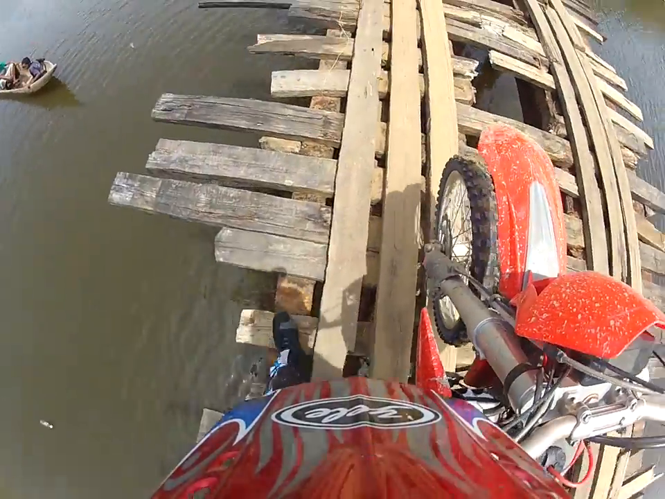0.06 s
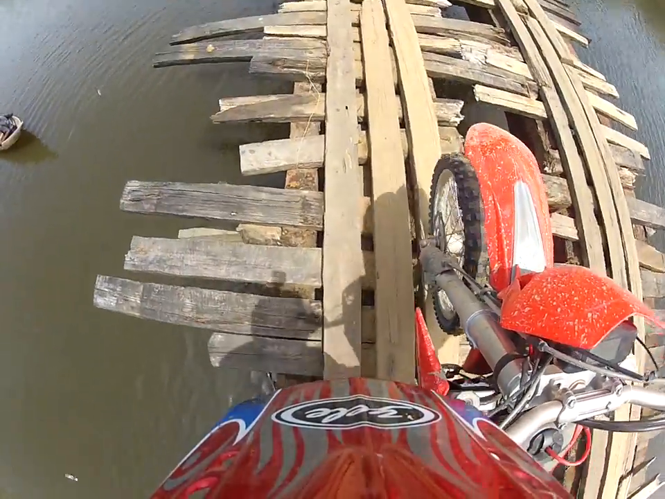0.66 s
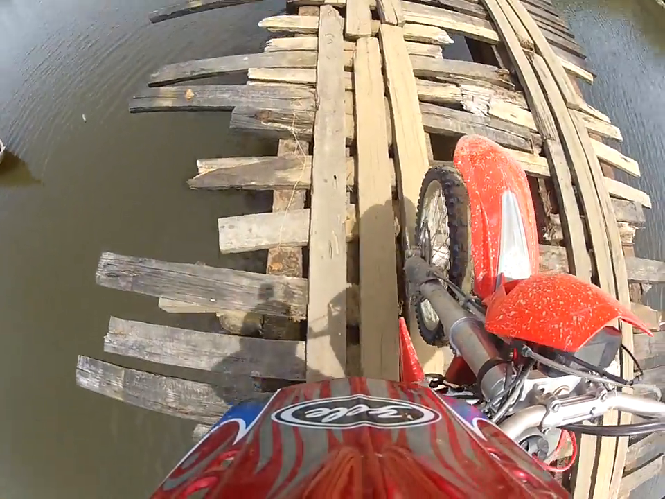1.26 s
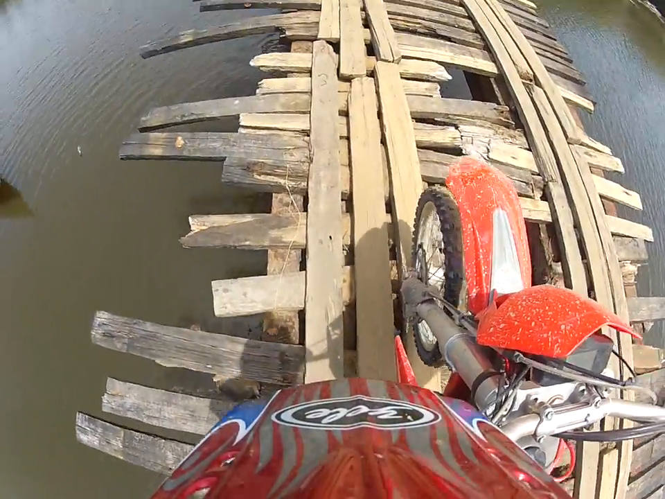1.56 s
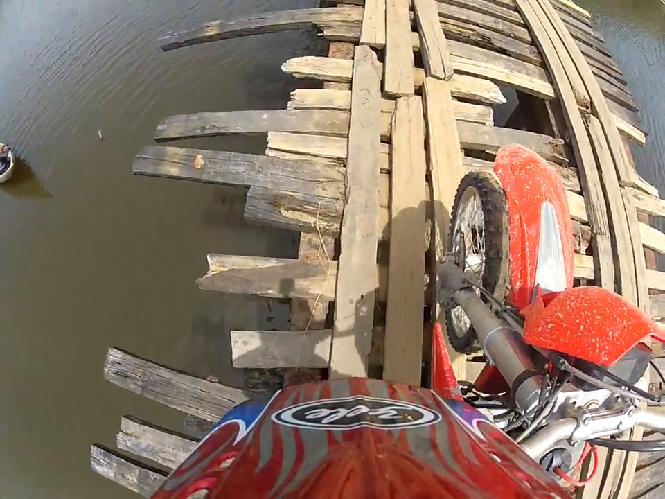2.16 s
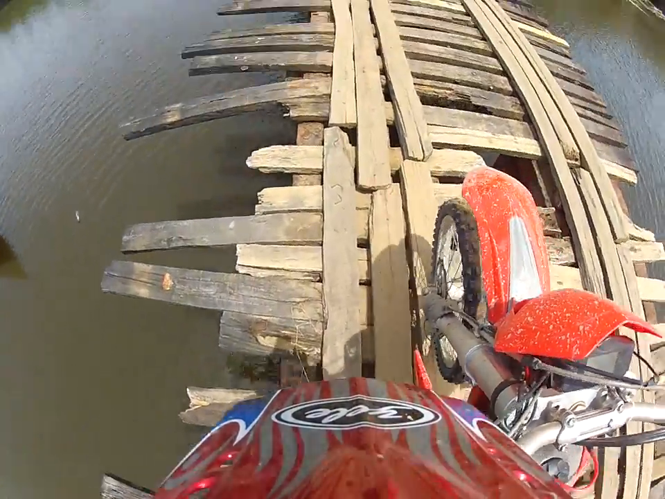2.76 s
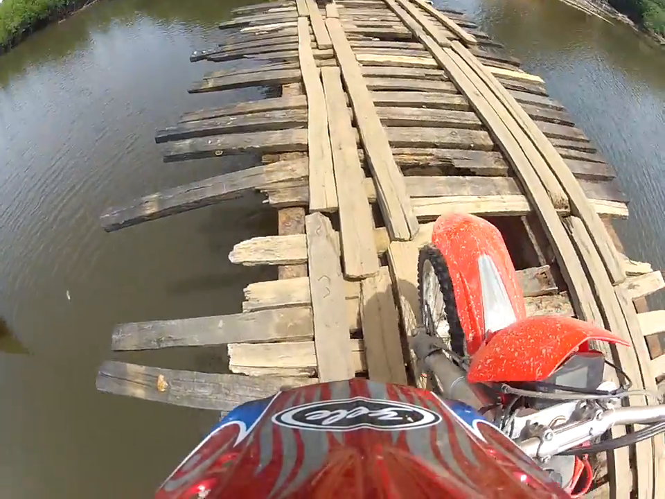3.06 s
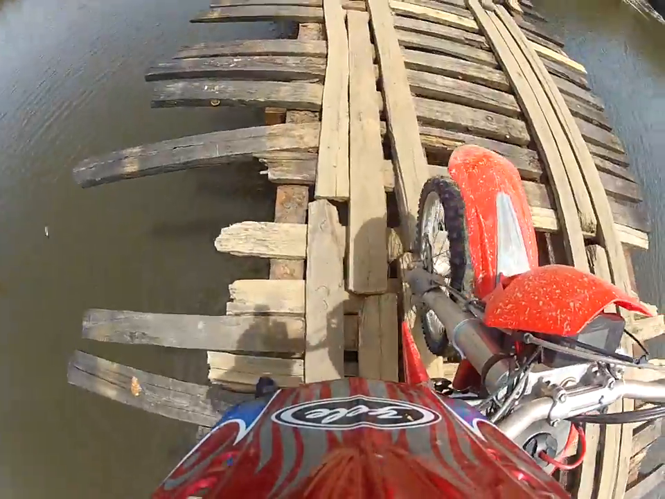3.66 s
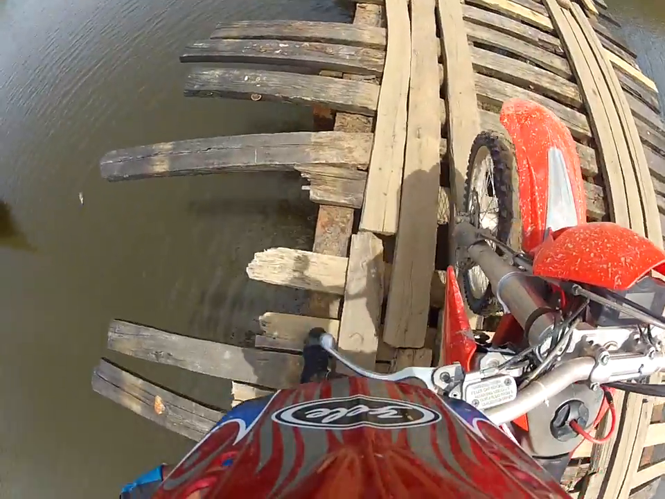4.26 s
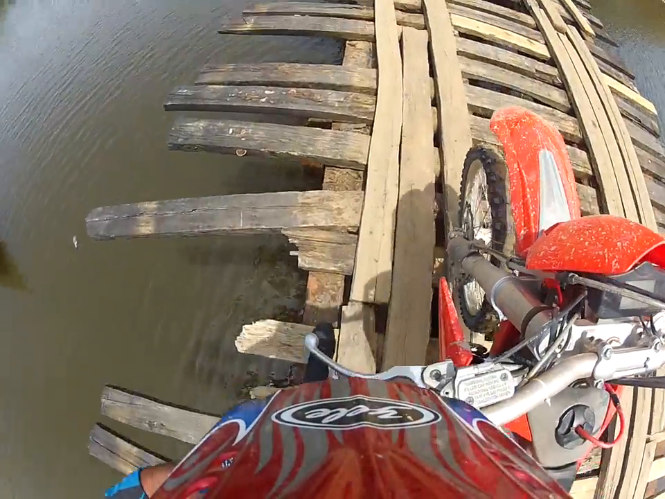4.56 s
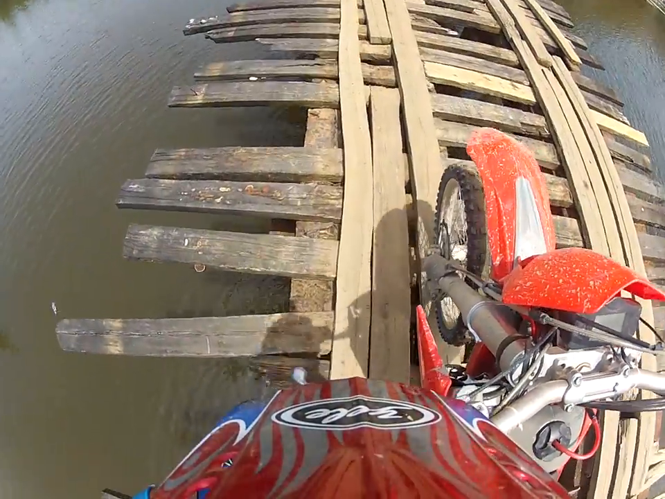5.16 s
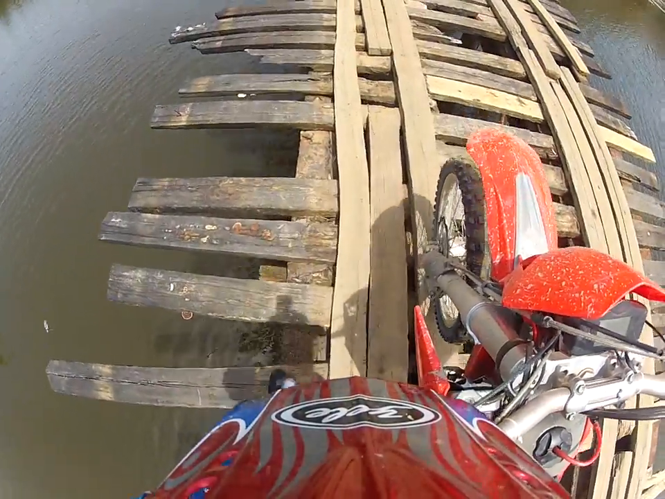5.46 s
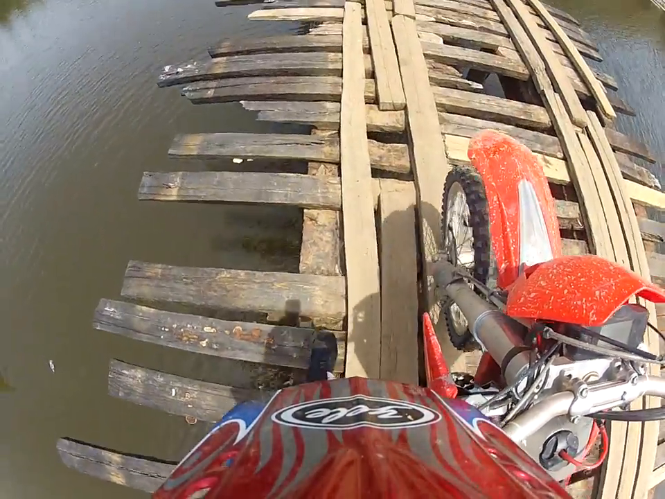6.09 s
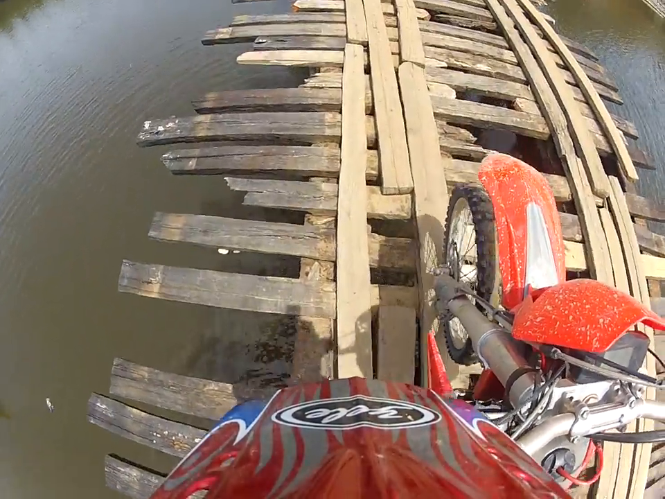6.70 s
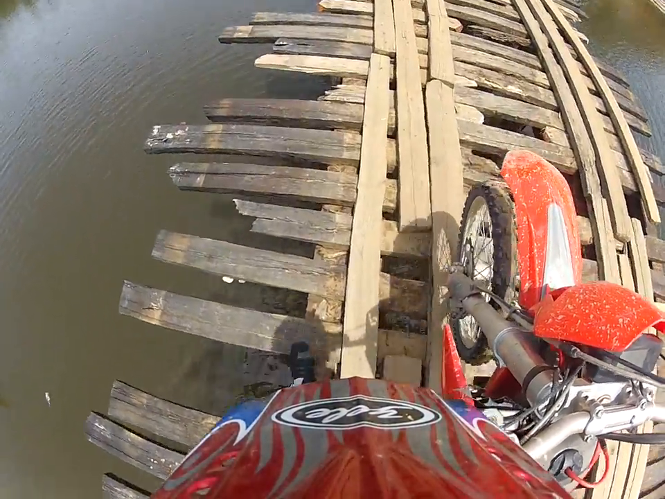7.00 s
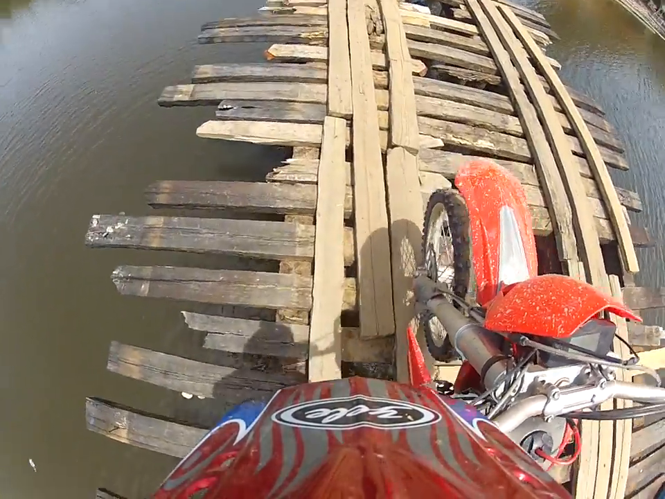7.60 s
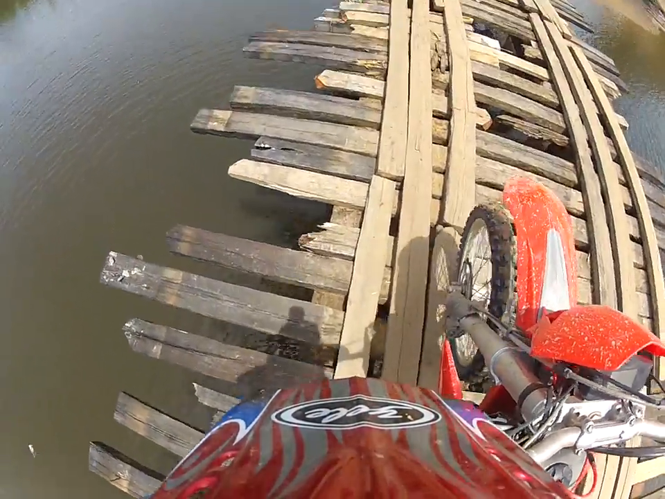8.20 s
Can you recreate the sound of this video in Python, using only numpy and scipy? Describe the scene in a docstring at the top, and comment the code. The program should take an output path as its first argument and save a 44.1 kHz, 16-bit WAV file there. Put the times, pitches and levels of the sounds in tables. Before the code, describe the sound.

A dirt bike's engine putters quietly outdoors while it rolls across a footbridge of loose boards, heard from close by without echo. The planks are much louder, giving dry clacks and hollow thumps in irregular bunches with short gaps between. The sharpest cracks come about three and five seconds in, and the clatter gets busier near the end. Faint gritty scrapes and soft rumbling lurches accompany the knocking.

```python
"""Loose planks clack as a dirt bike is walked over a footbridge, its single cylinder idling quietly.
Each impact excites resonances and reaches a bike-level camera as a dry clack with a low thud: the
harder, the shorter the contact and the brighter the sound. A few boards crack sharply. About once a
second the bike lurches, which sets the camera mount swaying and the fittings rattling. The camera
holds each of its slow samples, and the spectral images put a thin metallic edge on every clack."""
import sys
import numpy as np
from scipy import signal
from scipy.fft import rfft, irfft, next_fast_len
from scipy.io import wavfile
from scipy.ndimage import map_coordinates

SR = 44100
rng = np.random.default_rng(int(sys.argv[2]) if len(sys.argv) > 2 else 0)


def to_wav(sig):
    """Store sig (one row per channel, or 1-D mono) as 16-bit WAV at the path in sys.argv[1].

    Samples outside -1..1 are clipped; the rate is SR.
    """
    pcm = np.clip(np.atleast_2d(sig), -1, 1) * 32767
    pcm = np.round(pcm).astype(np.int16)
    wavfile.write(sys.argv[1], SR, pcm.T)  # frames by channels


N = 367794


# impacts of loose boards: t/s, relative level/dB
KNOCKS = [(0.1944, 5.5), (0.2127, -4), (0.3212, 2.5), (0.4229, 4), (0.4949, -1), (0.7385, 0), (2.0278, 9.5),
          (2.0715, 3.5), (2.1258, 0), (2.1895, -3.5), (2.4618, -5.5), (2.9377, 6.5), (2.9797, 0),
          (3.008, -3.5), (3.0185, 2), (3.0744, 6), (3.0894, -5.5), (3.134, -5.5), (3.2072, 7.5),
          (3.266, 4.5), (3.8042, 5), (3.815, 4), (3.9262, 2), (4.8281, 9), (4.8799, 3.5), (5.5134, 9.5),
          (5.7028, 2), (6.5703, 8.5), (6.64, -9), (6.7812, -1.5), (7.1398, 7), (7.1695, -1.5),
          (7.2437, 6.5), (7.2671, 2.5), (7.2917, -2.5), (7.3716, 2), (7.7205, 4), (7.909, -2), (8.0027, 1),
          (8.0752, 0.5), (8.1478, -6.5), (8.2112, 1.5), (8.2345, -3), (8.2938, -2)]
def clacks(contact_ms=.43, ms_per_db=.031, shortest_ms=.14):
    """Elastic impact: a harder blow has a shorter contact time and hence a wider spectrum."""
    force = np.zeros(N)
    for s, db in KNOCKS:
        strike(force, s, db, max(contact_ms - ms_per_db * db, shortest_ms))
    return transmitted(force)


# resonances (+) and antiresonances (-) that every knock passes: f/Hz, bandwidth/Hz, gain/dB
BODY = [(420, 330, 4), (630, 267, -12), (708, 25, 4), (750, 28, -5), (979, 159, 17), (1171, 94, 5),
        (1351, 25, -14), (1713, 95, 4), (2078, 305, 23), (2300, 120, 2), (2505, 50, -18), (2750, 58, -22),
        (3030, 120, 3), (3400, 120, -7), (3670, 90, 5), (3989, 700, -18)]
# treble roll-off of the clacks: f/Hz, amplitude ratio
TREBLE_ROLLOFF = [(4000, 1), (4800, .9), (5600, .3)]
def transmitted(force):
    """Structure-borne sound: resonances colour a force, and the clacks lose their treble above about 5 kHz."""
    return filtered(force, lambda hz: resonances(BODY, hz) * along(TREBLE_ROLLOFF, hz))


# low modes shaken by a knock: f/Hz, relative level/dB, T60/s
THUD_MODES = [(68, -37.5, 0.024), (95, -17, 0.18), (122.6, -2.5, 0.12), (217, -15.5, 0.065),
              (295, -6, 0.026)]
def thuds(gain_db=-29, growth=.33, contact_ms=.43, ms_per_db=.031, shortest_ms=.14):
    """Modal response: the same impacts ring low modes, which grow more slowly than the clack."""
    force = np.zeros(N)
    for s, db in KNOCKS:
        strike(force, s, gain_db + growth * db, max(contact_ms - ms_per_db * db, shortest_ms))
    return ring(force, THUD_MODES)


# cracks of strained wood: t/s, relative level/dB
CRACKS = [(2.0278, -6), (2.9572, 0), (2.9797, -9), (3.0185, 13.5), (3.077, -1), (3.266, -3), (4.8282, 13),
          (4.8394, -12), (5.5134, -5), (6.5703, -8)]
# spectrum of splintering: f/Hz, relative density level/dB
SPLINTER_SPECTRUM = [(200, -2.5), (600, -8.5), (1500, 1.5), (3000, -1.5), (3600, 1), (4400, -6),
                     (6000, -13.5)]
def cracks(edge_db=-30.5, edge_growth=1.7, snap_db=-4, snap_growth=.46, snap_ms=.044):
    """Release of strain: a crack is a snap and splinter noise; knocks get a splintery edge too."""
    snaps, splinters = np.zeros((2, N))
    for s, db in KNOCKS:
        add(splinters, s, amp(edge_db + edge_growth * db) * splinter_burst())
    for s, db in CRACKS:
        strike(snaps, s, snap_db + snap_growth * db, snap_ms)
        add(splinters, s, amp(db) * splinter_burst())
    return transmitted(snaps) + fittings(splinters, SPLINTER_SPECTRUM)


def splinter_burst(energy_db=-2, t60=.013):
    """Exponential decay: a burst of noise that dies almost at once."""
    t = np.arange(SR // 20) / SR
    burst = rng.standard_normal(len(t)) * amp(-60 * t / t60)
    return amp(energy_db) * burst / np.linalg.norm(burst)


# modes of a sinking board: f/Hz, relative level/dB, T60/s
HEAVE_MODES = [(32.7, -3, 0.3), (58.3, -5, 0.11), (90, -6.5, 0.11)]
# boards bottoming out under load: t/s, relative levels of heave/dB, hollow knock/dB, woody ring/dB
BUMPS = [(.213, -41, -7, -44), (1.134, -37, -17, -61), (2.029, -33, -5, -48), (3.022, -18, 0, -37),
         (3.07, -29, -12, -50), (4.135, -41, -12, -65), (4.828, -40.5, 15.5, -43), (7.245, -27, -6, -36),
         (7.292, -29.5, -6, -48.5), (8.208, -31, -11, -48)]
def bumps(soft_hz=250, hollow_hz=190, hollow_width_hz=260):
    """Damped vibration: a board settles on its beam with a slow heave and a heavily damped knock."""
    shoves, taps = np.zeros((2, N))
    for s, heave_db, knock_db, _ in BUMPS:
        add(shoves, s, amp([heave_db]))
        add(taps, s, amp([knock_db]))
    heave = filtered(ring(shoves, HEAVE_MODES), lambda hz: 1 / (1 + 1j * hz / soft_hz))
    return heave + filtered(taps, lambda hz: bandpass(hz, hollow_hz, hollow_width_hz))


def chatter(plank_hz=700, width_hz=240, t60=.075):
    """Noise-driven resonance: a board chattering on its beam rings briefly with a woody note."""
    envelope, t = np.zeros(N), np.arange(SR // 4) / SR
    for s, _, _, ring_db in BUMPS:
        add(envelope, s, amp(ring_db - 60 * t / t60))
    wood = filtered(rng.standard_normal(N), lambda hz: bandpass(hz, plank_hz, width_hz) ** 2)
    return envelope * unit(wood)


# forward lurches of the bike: centre t/s, duration/s, relative level/dB
LURCHES = [(.26, .2, -34), (1.234, 0.16, -31.5), (2.05, 0.21, -28.5), (3.13, .26, -33.5), (3.683, .23, -31),
           (4.57, .16, -40), (4.772, .12, -30), (5.55, 0.45, -31), (6.561, 0.34, -32), (7.308, 0.4, -28),
           (7.82, .2, -40), (8.228, 0.29, -30.5)]
def lurching():
    """Amplitude envelope of the bike's rocking: each lurch swells and fades smoothly."""
    rock = np.zeros(N)
    for s, length, db in LURCHES:
        add(rock, s - length / 2, amp(db) * np.hanning(int(length * SR)))
    return rock


def mount_sway(natural_hz=27.5, drift=.11, gain_db=-2.5, uneven_db=2.5, rest_db=-45, waver_db=3.5):
    """Mass on a spring: the mount rocks near its natural frequency, harder at each lurch."""
    driven = lurching() * amp(uneven_db * wobble(22))
    resting = amp(rest_db + waver_db * wobble(9))
    phase = 2 * np.pi * np.cumsum(natural_hz * (1 + drift * wobble(10))) / SR
    return amp(gain_db) * (driven + resting) * unit(np.sin(phase))


# strokes on the boards: t/s, duration/s, level/dB
SCRAPES = [(0, 0.11, -52), (0.273, 0.2, -66), (1.593, 0.072, -58.5), (2.954, 0.021, -39),
           (6.757, 0.052, -44.5), (7.51, 0.054, -59.5)]
# spectrum of a rubbed board: f/Hz, relative density level/dB
RUB_SPECTRUM = [(300, -19), (1400, 1.5), (2400, 3), (3100, -4), (4000, -18), (6000, -22.5)]
def scrapes(grit_db=3):
    """Sliding friction: tyre and boots drag over the wood in brief, gritty strokes of noise."""
    strokes = np.zeros(N)
    for s, length, db in SCRAPES:
        add(strokes, s, amp(db) * signal.windows.tukey(int(length * SR)))
    grit = rng.standard_normal(N) * amp(grit_db * wobble(400))
    return strokes * unit(fittings(grit, RUB_SPECTRUM))


# a short squeak: t/s, duration/s, start f/Hz, end f/Hz, peak level/dB
SQUEAKS = [(6.982, 0.064, 2210, 2350, -52)]
def squeak():
    """Linear chirp: a sine glides upward as it swells and fades."""
    out = np.zeros(N)
    for s, length, start_hz, end_hz, db in SQUEAKS:
        n = int(length * SR)
        phase = 2 * np.pi * np.cumsum(np.linspace(start_hz, end_hz, n)) / SR
        add(out, s, amp(db) * np.hanning(n) * np.sin(phase))
    return out


def engine(firing_hz=14, unsteady=.04, exhaust_db=-51.5, boom_db=2.5, rattle_db=1.5):
    """Four-stroke cycle: one firing every two turns paces exhaust and whir; both swell in a lurch."""
    rock = lurching()
    rock = rock / rock.max()
    cycle = np.cumsum(firing_hz * (1 + unsteady * wobble(3.6))) / SR
    return amp(exhaust_db + boom_db * rock) * exhaust(cycle) + amp(rattle_db * rock) * whir(cycle)


# exhaust resonances: f/Hz, relative level/dB, T60/s
PIPE_MODES = [(78.6, -29, 0.03), (120.3, 1.5, .13), (196, -3, .08), (224, -5, 0.074), (294.6, -5.5, 0.073),
              (338, -20, 0.017)]
def exhaust(cycle, scatter_db=1.8, puff_db=2, muffler_hz=420):
    """Pipe resonance: each firing and its rush of gas ring the pipe; the muffler is a low-pass."""
    firings = np.diff(np.floor(cycle), prepend=0) * amp(scatter_db * rng.standard_normal(N))
    puffs = rng.standard_normal(N) * amp(-9 * (cycle % 1))
    pipe = unit(ring(firings, PIPE_MODES)) + amp(puff_db) * unit(ring(puffs, PIPE_MODES))
    return unit(filtered(pipe, lambda hz: 1 / (1 + (hz / muffler_hz) ** 4)))


# spectrum of valve gear and air: f/Hz, relative density level/dB
WHIR_SPECTRUM = [(100, 10.5), (350, 4), (600, 0), (800, -2.5), (1400, -8), (2300, -10), (2800, -11),
                 (4400, -14), (5300, -16), (6000, -19)]
# slow course of the whir: t/s, relative level/dB
WHIR_LEVELS = [(0.0, -62.5), (1.32, -63.5), (3.25, -63), (3.55, -64.5), (5.64, -62), (6.06, -65),
               (7.15, -60.5), (7.67, -63.5), (8.34, -62)]
def whir(cycle, gain_db=6, throb_db=2.5, waver_db=.37):
    """Amplitude modulation: the noise of valve gear and air throbs in step with the firings."""
    level_db = np.interp(np.arange(N) / SR, *np.transpose(WHIR_LEVELS))
    noise = unit(fittings(rng.standard_normal(N), WHIR_SPECTRUM))
    throb = amp(throb_db * np.cos(2 * np.pi * cycle) + waver_db * wobble(12))
    return amp(level_db + gain_db) * throb * noise


# resonances of the bike's thin fittings: f/Hz, bandwidth/Hz, gain/dB
FITTINGS = [(967, 65, 7.5), (1174, 45, 8), (1903, 256, 12.5), (2437, 180, 9.5), (3010, 100, 5.5),
            (3660, 150, 4.5), (3890, 75, 3), (4230, 110, 2), (5140, 170, 6)]
def fittings(x, spectrum, cutoff_hz=6000):
    """Forced vibration: x takes on a broad, band-limited spectrum and rings the fittings."""
    def response(hz):
        return amp(along(spectrum, hz)) * resonances(FITTINGS, hz) / (1 + (hz / cutoff_hz) ** 20)
    return filtered(x, response)


def strike(force, s, db, contact_ms):
    """Impulse: add a Gaussian force pulse centred on s seconds, its area set by db."""
    lead = 1 / 500  # seconds allowed for the rise
    t = np.arange(SR // 20) / SR - lead
    bell = np.exp(-(2 * t * 1000 / contact_ms) ** 2)
    add(force, s - lead, amp(db) * bell / bell.sum())


def ring(blows, modes):
    """Convolution: each blow starts the same set of damped sines."""
    t = np.arange(SR // 2) / SR
    response = sum(amp(db - 60 * t / t60) * np.sin(2 * np.pi * hz * t) for hz, db, t60 in modes)
    return signal.fftconvolve(blows, response)[:N]


def resonances(table, f):
    """Causal transfer function of a structure: a cascade of peaks and notches."""
    response = 1
    for hz, width, db in table:
        spring, loss = hz * hz - f * f, 1j * f * width
        response = response * (spring + loss * max(amp(db), 1)) / (spring + loss * max(amp(-db), 1))
    return response


def bandpass(f, centre_hz, width_hz):
    """Velocity response of a damped oscillator, 1 at resonance."""
    loss = 1j * f * width_hz
    return loss / (centre_hz ** 2 - f * f + loss)


def filtered(x, response):
    """Linear filtering: multiply the spectrum of x by a frequency response."""
    m = next_fast_len(N + SR // 2)
    return irfft(rfft(x, m) * response(np.fft.rfftfreq(m, 1 / SR)), m)[:N]


def along(points, hz):
    """Interpolation of (f/Hz, value) points on a logarithmic frequency axis."""
    f, v = np.transpose(points)
    return np.interp(np.log(hz + 1), np.log(f + 1), v)


def wobble(rate):
    """Random fluctuation: a spline with rate knots a second."""
    return map_coordinates(rng.standard_normal(int(N * rate / SR) + 4), [np.arange(N) * rate / SR])


def add(track, s, sound):
    """Superposition of a sound on a track at s seconds."""
    part = track[max(round(s * SR), 0):][:len(sound)]
    part += sound[:len(part)]


def amp(db):
    """Decibels to amplitude ratio."""
    return 10 ** (np.asarray(db) / 20)


def unit(x):
    """Normalisation to rms 1."""
    return x / np.sqrt(np.mean(x ** 2) + 1e-20)


def scene():
    """Free-field superposition: clattering boards over the idling engine, dry in the open air."""
    boards = clacks() + thuds() + cracks() + bumps() + chatter()
    return (boards + mount_sway() + scrapes() + squeak() + engine())[None]


def record(dry, hold_hz=12000, ceiling=.9, top_hz=15600):
    """Zero-order hold: holding each slow sample mirrors the spectrum into the treble."""
    slow = signal.resample_poly(dry[0], hold_hz, SR)
    slow = slow / (1 + np.abs(slow / ceiling) ** 10) ** (1 / 10)  # overload flattens the peaks
    held = signal.resample_poly(np.repeat(slow, 4), SR, 4 * hold_hz)[:N]
    return filtered(held, lambda hz: 1 / np.sqrt(1 + (hz / top_hz) ** 120))[None]


dry = scene()
out = record(dry)
to_wav(out)
```